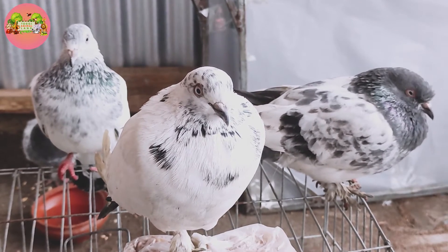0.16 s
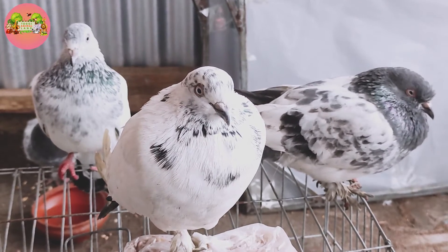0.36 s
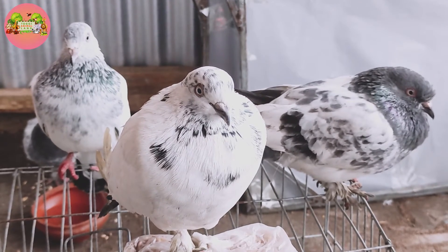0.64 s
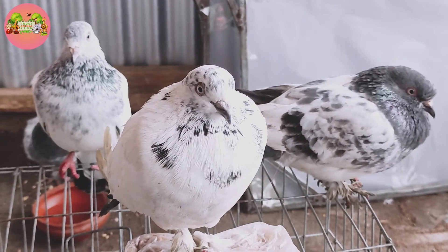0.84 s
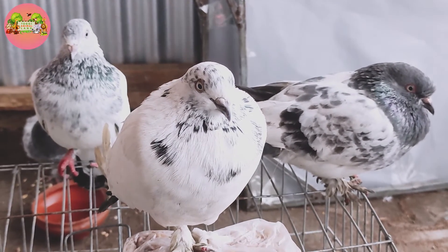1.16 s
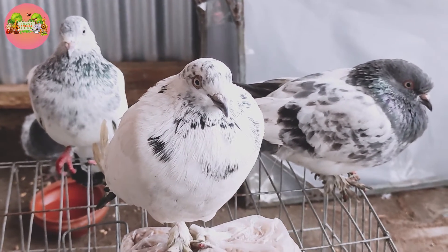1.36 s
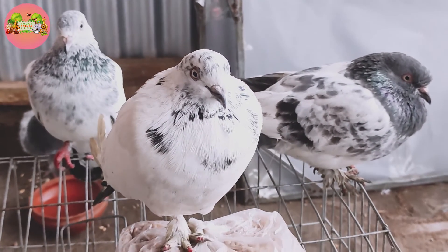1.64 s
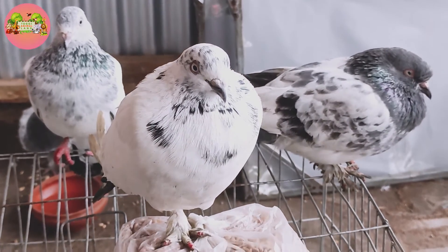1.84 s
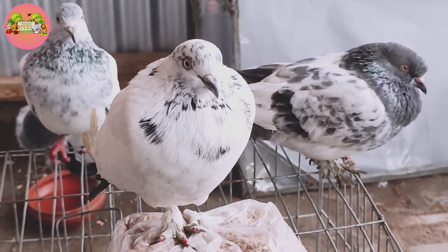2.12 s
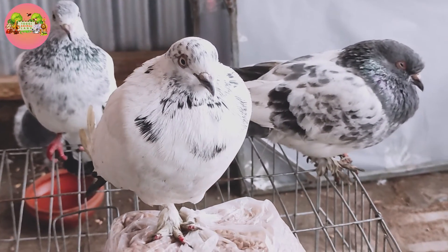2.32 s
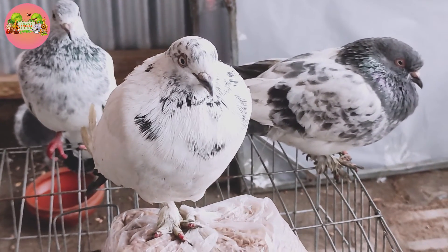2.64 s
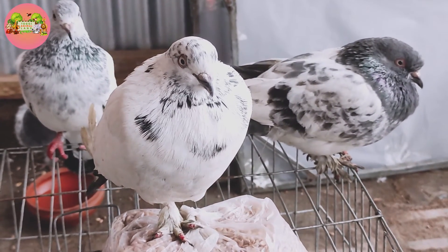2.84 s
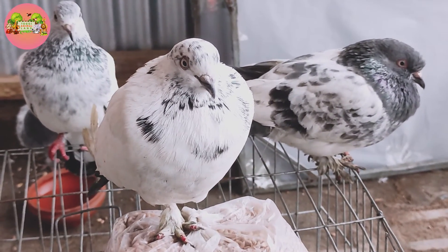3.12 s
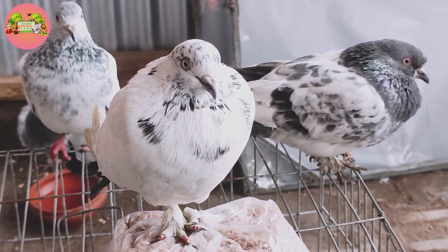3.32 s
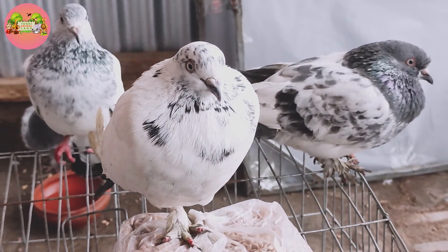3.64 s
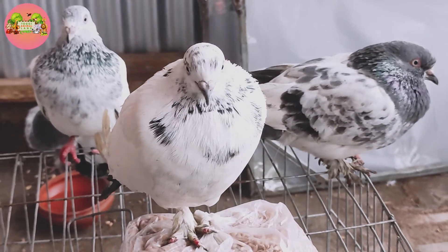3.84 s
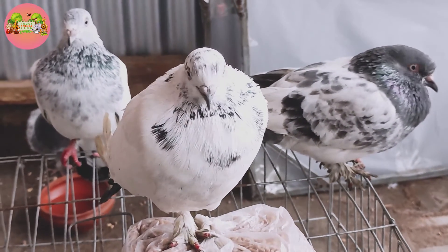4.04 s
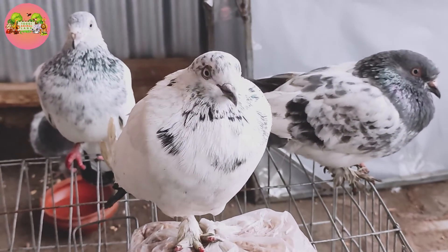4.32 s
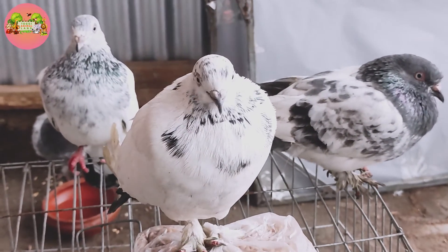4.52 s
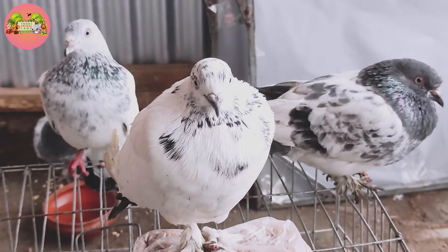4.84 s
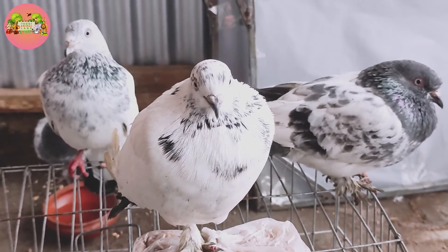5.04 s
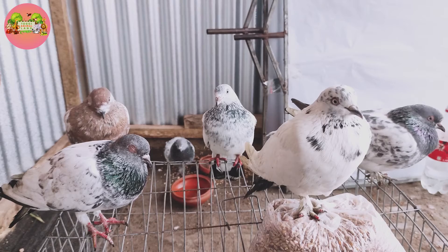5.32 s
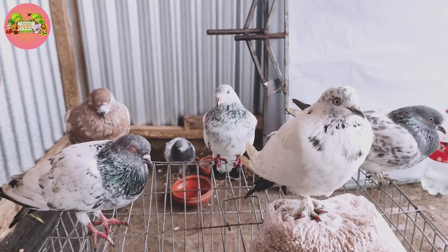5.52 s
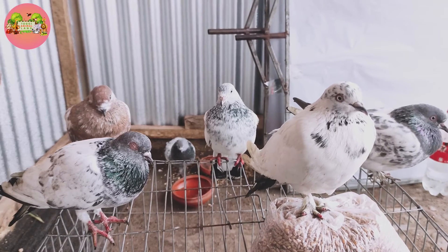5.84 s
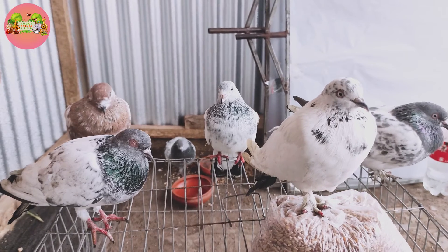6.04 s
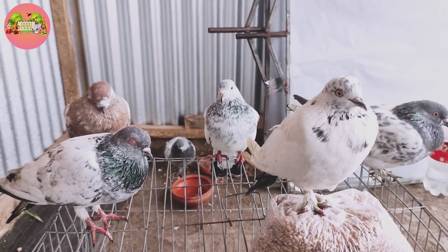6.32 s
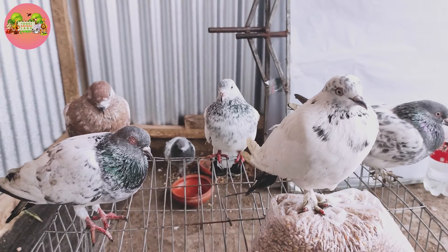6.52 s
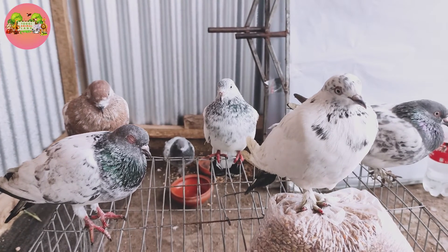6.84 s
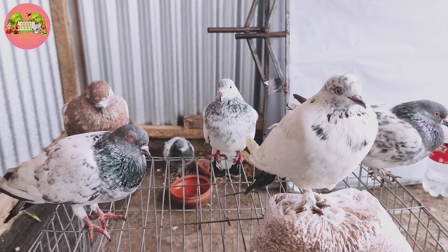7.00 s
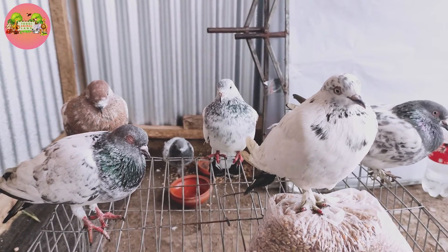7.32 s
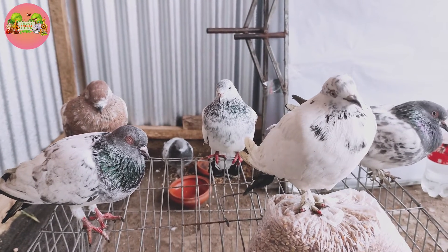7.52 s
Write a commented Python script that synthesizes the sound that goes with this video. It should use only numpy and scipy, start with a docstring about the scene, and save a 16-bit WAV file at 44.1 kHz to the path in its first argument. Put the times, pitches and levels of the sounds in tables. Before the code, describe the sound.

A nearby pigeon hums muffled, round coos about every one and a half seconds, each swelling upward and then gargling as it fades. A hoarse bird at middle distance answers with wheezy squeals opening into rasps, and small paired croaks. Tiny gliding chirps come from outside, densest in the first half. Stereo microphones inside a lightly reverberant metal shed also catch soft outdoor air, low motor hum and occasional bumps.

```python
"""A loft of sheet metal and tarpaulin, where a pigeon coos close by and to the left.
Each coo is a few hummed harmonics that swell in an arch of pitch and break into a throaty flutter.
Another bird squawks hoarsely, in squeals (a thin wheeze of resonant noise that opens into a rasp) and
short double croaks. Small birds chirp outside as warbled glides, heard mostly as echo, over an airy
wash of filtered noise, a far motor's low hum and a few soft knocks."""
import sys
import numpy as np
from scipy import signal
from scipy.fft import rfft, irfft, next_fast_len
from scipy.io import wavfile
from scipy.ndimage import uniform_filter1d, map_coordinates

SR = 44100
rng = np.random.default_rng(int(sys.argv[2]) if len(sys.argv) > 2 else 0)


def generate_wav(signal):
    """Clip the signal to [-1, 1] and save it as 16-bit WAV at the path in sys.argv[1]."""
    frames = np.transpose(np.atleast_2d(signal))
    scaled = np.clip(frames, -1, 1) * 32767
    pcm = np.round(scaled).astype(np.int16)
    wavfile.write(sys.argv[1], SR, pcm)


N = 338247

# Colour of the outdoor wash. Each row: frequency in Hz, relative density in dB per Hz.
AIR_COLOUR = [(20, -35.5), (40, -26), (56, -17), (75, -5), (98, -10), (129, -9), (164, -7.5), (205, -2.5),
              (310, -12), (520, -18), (1310, -20.5), (2420, -28.5), (6500, -34), (11000, -49),
              (15500, -59.5)]
# How alike the wash is left and right. Each row: frequency in Hz, likeness 0-1.
AIR_LIKENESS = [(60, 0.64), (160, 0.53), (430, 0.17), (1140, 0.51), (3050, 0.21), (8160, 1)]
# Stereo lean of wash, hum and knocks. Each row: frequency in Hz, left minus right in dB.
BACKGROUND_BALANCE = [(60, 9), (160, 3), (430, 2.5), (1140, -1), (3050, 1), (8160, 0.0)]
# A far motor's hum. Each row: frequency in Hz, width in Hz, early level in dB, late level in dB.
HUM_LINES = [(66.4, 10, -52.5, -54), (130, 3.5, -52.5, -46), (222.7, 14, -52.5, -49.5)]
# Rising squeals. Each row: time the wheeze opens into a rasp in seconds, wheeze length in seconds,
# rasp length in seconds, level in dB, swell over the wheeze in dB, brightness in dB, first, second and
# last pitch in Hz, second resonance in dB, rasp share 0-1, rasp centre in Hz, shrill overtone in Hz,
# its level in dB, its entry after the opening in seconds.
SQUEALS = [(0.386, 0.042, 0.077, -33.5, 15, -12, 1526, 1570, 1590, 17, 0.14, 2000, 5420, -13, -.01),
           (.478, 0.068, 0.042, -27, 20, -2.5, 1720, 1790, 1830, 5, 0.23, 2200, 5030, -10, -0.000097),
           (2.379, 0.09, .044, -28, 13, -4.5, 1442, 1560, 1657, 0, .32, 2400, 4490, -15, -0.041),
           (3.524, .095, .044, -20, 22.5, -5.5, 1973, 2180, 2310, -16, 0.75, 1420, 4074, -5, -.025),
           (4.641, .11, .122, -19, 30.5, -7.5, 1638, 1760, 2042, -8, .8, 2300, 4100, -9, .028),
           (5.646, .08, .04, -35, 12.5, -5, 1930, 2145, 2600, -17, 0.8, 1500, 4330, -12, -.022),
           (5.897, .105, .044, -28, 17, -5.5, 1830, 2170, 2520, -15, 0.45, 2450, 4350, -10, -.033),
           (6.369, 0.092, .029, -33, 9.5, -6.5, 1670, 1740, 1835, -9, 1, 1700, 5560, -13.5, -0.054),
           (7.061, 0.081, .082, -26, 11.5, -7, 1530, 1620, 1680, -4.5, 0.2, 1450, 4900, -16, -.02)]
# Upper resonances of the wheeze. Each row: ratio to the gliding pitch, width in Hz, level in dB.
WHEEZE_RESONANCES = [(2.0, 260, -19), (2.749, 299, -19.5), (3.5, 280, -18.5)]
# Colour of the rasp. Each row: frequency in Hz, relative density in dB per Hz.
RASP_COLOUR = [(470, -49.5), (800, -29), (910, -22.5), (996, -11), (1350, -3.5), (1640, -0.5), (1980, -3),
               (2390, -1.5), (2750, -4.5), (3200, -9.5), (4210, -11), (4650, -10), (5400, -11), (6080, -18),
               (7200, -20.5), (8610, -33), (11200, -56), (18900, -120)]
# Double croaks. Each row: first puff in seconds, level in dB, second puff above the first in dB,
# brightness in dB.
CROAKS = [(.535, -29.5, 1, -7), (2.018, -35.5, 3.5, -13), (2.614, -35.5, 1.5, -9), (3.184, -31, 5.5, -8),
          (3.839, -34.5, 2, -13), (4.68, -30, -2, -2.5), (5.159, -35.5, 2, -13), (5.939, -35.5, 1.5, -7),
          (6.089, -36, 4, -10.5), (6.58, -36.5, 0.5, -9.5), (6.93, -35.5, 1.5, -7.5),
          (7.15, -33.5, -1.5, -1.5), (7.32, -38, 2.5, -6.5)]
# The croak's voice. One row: the columns of a squeal from first pitch in Hz to shrill entry in seconds.
CROAK_VOICE = (1528, 1560, 1610.5, 1, 1.2, 1750, 4980, -17, -.03)
# How fast the loft's echo dies. Each row: frequency in Hz, time to fall 60 dB in seconds.
LOFT_DECAY = [(200, 1), (1000, 0.35), (3000, 0.58), (8000, 0.55)]
# Coos. Each row: start in seconds, length in seconds, top of the pitch arch in Hz, climb time in seconds,
# level in dB, tiring in dB per second, closing fall in seconds, share of the crop's deep boom in dB.
COOS = [(.56, 0.4, 149.5, .15, -17.5, 0, 0.025, 0), (1.489, 1.04, 230.2, 0.24, -14.5, 8.5, .16, -5.5),
        (3.09, 0.88, 231.5, 0.25, -16, 13.5, 0.04, -4.5), (4.55, 1.01, 232.4, 0.22, -15.5, 11, 0.084, -4.5),
        (6.275, 0.643, 230.2, .195, -14, 10, 0.029, -3), (7.36, 0.76, 236, 0.22, -14.5, 10, 0.063, -6.5)]
# Where the throat breaks into a flutter. Each row: middle in seconds, length in seconds,
# added roughness 0-1, loudness lost in dB.
FLUTTERS = [(0.72, 0.13, 0.06, 6.5), (2.014, 0.072, 0.16, 1), (2.184, 0.07, 0.19, 2),
            (2.314, 0.058, 0.55, 3), (2.38, 0.09, 0.41, 3), (3.504, 0.04, 0.21, 0.5),
            (3.671, 0.062, 0.41, 4), (3.765, 0.1, 0.46, 3.5), (5.121, 0.11, 0.33, 5), (5.27, 0.078, .4, 2),
            (5.398, 0.2, 0.42, 2.5), (6.723, 0.042, 0.27, 1), (6.798, 0.094, 0.18, 6.5)]
# What closed beak and swollen throat let through. Each row: frequency in Hz, gain in dB.
THROAT = [(100, -46.5), (170, -16), (215, 11), (290, 2.5), (335, -6.5), (380, -2), (450, 4.5), (530, -0.5),
          (585, -17), (700, -22.5), (900, -42.5), (1400, -85)]
# Low loft resonances that the coo sets ringing. Each row: frequency in Hz, width in Hz, level in dB.
LOFT_RINGS = [(293.5, 7.1, 6), (368.4, 9.2, 3.5), (517, 22, -8.5)]
# The pigeon's level at the two microphones. Each row: frequency in Hz, left minus right in dB.
COO_BALANCE = [(225, 4.7), (290, 2.5), (450, 4.2), (530, 7)]
# The pigeon's phase at the two microphones. Each row: frequency in Hz, lead of the left in radians.
COO_PHASE = [(225, -.58), (290, -1.0), (380, -.3), (450, 0), (530, .7)]
# Soft knocks in the loft. Each row: start in seconds, frequency in Hz, width in Hz, level in dB,
# time to fall 60 dB in seconds.
KNOCKS = [(0.83, 698, 610, -34.5, 0.37), (1.122, 910, 454, -26.5, 0.11), (5.53, 111.4, 40.16, -38.5, 1)]
# Small birds outside. Each row: start in seconds, length in seconds, first pitch in Hz, last pitch in Hz,
# level in dB before distance.
CHIRPS = [(1.326, 0.067, 3600, 4810, -43.5), (1.524, 0.035, 3600, 2920, -47),
          (1.531, 0.024, 7070, 6370, -52), (1.618, 0.052, 5660, 4580, -41), (1.768, 0.061, 5260, 3390, -40),
          (1.888, 0.03, 3800, 3560, -53), (1.948, 0.025, 3530, 3190, -46.5),
          (2.525, 0.052, 5000, 3720, -42.5), (2.723, 0.027, 5250, 4730, -39.5),
          (2.735, 0.035, 4100, 3310, -41.5), (2.863, 0.081, 4640, 3860, -39.5),
          (3.008, 0.077, 4790, 4560, -42), (3.092, 0.042, 4210, 3570, -45),
          (3.375, 0.054, 5600, 3900, -40.5), (3.711, 0.042, 4370, 3330, -43),
          (4.068, 0.035, 4820, 3540, -51), (6.64, 0.039, 4820, 4410, -45),
          (6.809, 0.073, 3490, 5000, -43.5)]

AIR_DB, AIR_SWELL_DB = -41.5, 1.46
HUM_SHIFTS_S = 5.2

# The squeal's pitch steps up twice: times from the opening.
PITCH_STEPS_S = (-.034, .005)
SQUEAL_ATTACK_S, SQUEAL_SAG_DB_PER_S, SQUEAL_RELEASE_DB_PER_S = 0.025, 49, 449
PUFF_GAP_S, PUFF_RISE_S, PUFF_FALL_S = 0.068, 0.029, 0.022

# Every coo climbs from one low pitch and sags by this share as it closes.
COO_START_HZ, CLIMB_CURVE, END_SAG = 109.67, 1.35, .2
# Loudness follows pitch, and drops further once the bird tires.
FULL_HZ, SOFTER_DB_PER_OCTAVE, TIRES_AFTER_S = 239.7, 14, 0.52
COO_ATTACK_S, COO_RELEASE_S = 0.071, 0.065
# Roughness 0-1 at the starting pitch and at full pitch, before any flutter.
ROUGH_LOW, ROUGH_FULL = 0.43, 0.21
FLUTTER_LIFT = 0.0488  # share of pitch added per unit of flutter roughness
# The crop booms once the pitch is high enough, and the whole voice gains with it.
BOOM_FROM_HZ, BOOM_SPREAD_HZ, BOOM_LOW_DB, BOOM_GAIN_DB = 210, 9.4, -8.5, 8

COO_ROOM_DB, CHIRP_DIRECT_DB = -13, -15
EDGE_HZ = 15500


def gain_of(db):
    """Decibels to gain."""
    return 10 ** (np.asarray(db) / 20)


def evened(x):
    """Scales to rms 1."""
    return x / np.sqrt(np.mean(x ** 2) + 1e-20)


def read(points, hz):
    """Reads a table on a log-frequency axis."""
    f, value = np.transpose(points)
    return np.interp(np.log(hz + 1), np.log(f + 1), value)


def add(mix, s, sound):
    """Mixes a sound in at time s."""
    part = mix[max(round(s * SR), 0):][:len(sound)]
    part += sound[:len(part)]


def shaped(x, gain):
    """Filters by a gain that is a function of frequency."""
    size = next_fast_len(x.shape[-1] + 4096)
    spectrum = rfft(x, size) * gain(np.fft.rfftfreq(size, 1 / SR))
    return irfft(spectrum, size)[..., :x.shape[-1]]


def wander(size, hz):
    """Smooth random drift of rms about 1, up to about hz changes a second."""
    knots = rng.standard_normal(int(size / SR * hz * 2) + 4)
    return map_coordinates(knots, [np.arange(size) / SR * hz * 2], order=3, mode="mirror")


def steadied(x, seconds):
    """Holds the running power near 1."""
    size = max(int(seconds * SR), 2)
    power = uniform_filter1d(uniform_filter1d(x ** 2, size), size)
    return x / np.sqrt(abs(power) + 1e-12)


def split(x, hz):
    """The parts below and above hz."""
    low = shaped(x, lambda f: 1 / (1 + (f / hz) ** 24))
    return low, x - low


def whistle(size, hz, width):
    """Noise in a steep resonance that follows hz: slow noise around zero, shifted up to pitch."""
    r = np.exp(-np.pi * abs(width) / SR)
    noise = rng.standard_normal((size + 4096, 2)) @ [1, 1j]
    slow = signal.lfilter([1], [1, -2 * r, r * r], noise)[-size:]
    carrier = np.exp(2j * np.pi * np.cumsum(hz * np.ones(size)) / SR)
    return evened((slow * carrier).real)


def placed(x, balance, phase):
    """Gives each microphone its own level and phase."""
    side = np.array([[.5], [-.5]])
    return shaped(x, lambda f: gain_of(side * read(balance, f)) * np.exp(1j * side * read(phase, f)))


def air():
    """Gently swelling outdoor wash: noise widest in the low mids, alike in both ears at the top."""
    left, other = rng.standard_normal((2, N))
    same = lambda f: np.clip(read(AIR_LIKENESS, f), 0, 1)
    right = shaped(left, same) + shaped(other, lambda f: np.sqrt(1 - same(f) ** 2))
    wash = evened(shaped(np.array([left, right]), lambda f: gain_of(read(AIR_COLOUR, f))))
    return wash * gain_of(AIR_DB + AIR_SWELL_DB * wander(N, 3))


def hum():
    """A far motor: wavering narrow noise lines, the upper two growing late on."""
    late = np.clip((np.arange(N) / SR - HUM_SHIFTS_S) / 0.14, 0, 1)
    total = np.zeros(N)
    for hz, width, early_db, late_db in HUM_LINES:
        line = steadied(whistle(N, hz, width), 0.26)
        total += gain_of(early_db + (late_db - early_db) * late) * line
    return total


def sputter(x, patch_db, count=4):
    """Breaks a hiss into uneven clusters, some hundred hertz wide and some milliseconds long."""
    z = signal.stft(x, nperseg=256)[2]
    chance = rng.standard_normal(z.shape)
    patches = evened(uniform_filter1d(uniform_filter1d(chance, count, 0), count, 1))
    return signal.istft(z * gain_of(patch_db * patches), nperseg=256)[1][:len(x)]


def squawk(t, bright_db, first_hz, second_hz, last_hz, second_db, share, rasp_hz,
           shrill_hz, shrill_db, shrill_s):
    """Air sings in stepping, fraying resonances; a shrill overtone slides in, a rasp opens at t = 0."""
    size = len(t)
    after = lambda s, ramp_s: (1 + np.tanh((t - s) / ramp_s)) / 2
    pushed, forced = (after(s, .0077) for s in PITCH_STEPS_S)
    stepped_hz = first_hz + (second_hz - first_hz) * pushed + (last_hz - second_hz) * forced
    hz = stepped_hz * (1 + .01196 * pushed * wander(size, 40.23))
    following = lambda part: first_hz + part * (hz - first_hz)  # the higher resonances glide less

    def frayed(centre, width):
        """A steady whistle with a wide, ragged one (650 Hz) joining as the pitch steps up."""
        ragged = gain_of(-7) * pushed * whistle(size, centre, 650)
        return steadied(whistle(size, centre, width), 0.0056) + ragged

    wheeze = frayed(hz, 55) + gain_of(second_db) * frayed(1.7 * following(.55), 160)
    for ratio, width, db in WHEEZE_RESONANCES:
        wheeze += gain_of(db) * whistle(size, ratio * following(.3), width)

    grainy = rng.standard_normal(size) * np.exp(.24 * wander(size, 130))
    hiss = sputter(grainy, patch_db=3.5)
    # a 5 dB bump lifts the rasp around its own centre
    rasp = shaped(hiss, lambda f: gain_of(read(RASP_COLOUR, f) + 5 / (1 + ((f - rasp_hz) / 350) ** 2)))
    # a little rasp leaks in before the opening
    harsh = np.clip(0.028 + .11 * pushed + share * after(0, .005), 0, .92)

    entry = after(shrill_s, .015)
    slide_hz = shrill_hz * (1 - .1 * (1 - entry))
    overtones = whistle(size, slide_hz, 260) + gain_of(-15) * whistle(size, 2 * slide_hz, 520)
    shrill = gain_of(shrill_db) * entry * split(overtones, 8460)[0]

    voice = np.sqrt(1 - harsh) * evened(wheeze) + np.sqrt(harsh) * evened(rasp) + shrill
    body, edge = split(voice, 3010)
    return steadied(body, 0.032) + gain_of(bright_db) * steadied(edge, 0.022)


def squeal(opens, wheeze_s, rasp_s, level_db, swell_db, *voice):
    """A wheeze swells until it opens; the rasp sags slowly, then drops away fast."""
    t = np.arange(-wheeze_s, rasp_s + .1, 1 / SR)
    db = level_db + swell_db * np.minimum(t / wheeze_s, 0)
    db -= SQUEAL_SAG_DB_PER_S * np.maximum(t, 0)
    db -= SQUEAL_RELEASE_DB_PER_S * np.maximum(t - rasp_s, 0)
    attack = np.minimum((t + wheeze_s) / SQUEAL_ATTACK_S, 1)
    return opens - wheeze_s, attack * gain_of(db) * squawk(t, *voice)


def loft(x, early_s=0.0099):
    """Reflections off metal walls: sparse taps, loudest at first, each band dying at its own speed."""
    size = SR // 2
    t = np.arange(size) / SR
    taps = rng.standard_normal((2, size)) * (rng.random((2, size)) < 3000 / SR)
    taps *= (t > .002) * (1 + 2 * np.exp(-t / early_s))
    hz, t, z = signal.stft(taps, SR, nperseg=256)
    decay = gain_of(-60 * t / read(LOFT_DECAY, hz)[:, None])
    tail = signal.istft(z * decay, SR, nperseg=256)[1]
    tail = tail / np.linalg.norm(tail, axis=1, keepdims=True)
    return signal.fftconvolve(x[None], tail, axes=1)[:, :N]


def croak(s, level_db, second_db, bright_db, lead_s=.06):
    """Two quick puffs of the same hoarse voice at a low, nearly level pitch."""
    t = np.arange(-lead_s, PUFF_GAP_S + 0.15, 1 / SR)
    puff = lambda u: np.where(u < 0, np.exp(-(u / PUFF_RISE_S) ** 2 / 2), 1 / np.cosh(u / PUFF_FALL_S))
    swell = np.hypot(puff(t), gain_of(second_db) * puff(t - PUFF_GAP_S))
    return s - lead_s, gain_of(level_db) * swell * squawk(t, bright_db, *CROAK_VOICE)


def ringing(f):
    """The throat's pass band times the ringing of the loft."""
    rings = sum(gain_of(db) / (1 + 2j * (f - hz) / width) for hz, width, db in LOFT_RINGS)
    return gain_of(read(THROAT, f)) * (1 + rings)


def coo(start, length, top_hz, climb_s, level_db, tiring_db, fall_s, boom_db):
    """The syrinx hums an arch; pushed, pitch flutters at a third of its rate, loudness at two thirds."""
    t = np.arange(0, length, 1 / SR)
    size = len(t)
    climb = top_hz + (COO_START_HZ - top_hz) * np.exp(-(t / climb_s) ** CLIMB_CURVE)
    arch = climb * (1 - END_SAG * np.exp((t - length) / fall_s))

    middle, span, depth, loss_db = np.transpose(FLUTTERS)
    within = np.exp(-(2 * (start + t[:, None] - middle) / span) ** 4)
    broken = within @ depth
    swollen = (1 + np.tanh((arch - BOOM_FROM_HZ) / BOOM_SPREAD_HZ)) / 2
    pitch = arch * (1 + FLUTTER_LIFT * broken)
    rough = np.interp(arch, [COO_START_HZ, FULL_HZ], [ROUGH_LOW, ROUGH_FULL])
    rough = np.clip(rough + broken, 0, 1)

    effort_db = level_db + SOFTER_DB_PER_OCTAVE * np.log2(arch / FULL_HZ)
    effort_db -= tiring_db * np.maximum(t - TIRES_AFTER_S, 0)
    effort_db += 1.27 * wander(size, 9.52) - within @ loss_db - BOOM_GAIN_DB * (1 - swollen)

    flutter = 2 * np.pi * np.cumsum(pitch * (1 + .051 * wander(size, 25))) / SR / 3
    jitter = .019 * (0.31 + 2 * rough) * wander(size, 50.04)
    phase = 2 * np.pi * np.cumsum(pitch * (1 + jitter)) / SR
    phase += 1.27 * rough * np.sin(flutter) / 2
    tone = 0.86 * np.cos(phase) + np.sin(2 * phase)
    tone += gain_of(-8) * (np.cos(3 * phase) + np.cos(4 * phase) / 2)

    # at its roughest the flutter falls apart into a gargle
    throb = 1 + .87 * rough * np.sin(2 * flutter)
    drive = tone * (1 - 0.97 * rough ** 2) * throb + rough * whistle(size, 370, 380)
    deep, upper = split(shaped(drive, ringing), 272.0)
    boom = np.clip(gain_of(BOOM_LOW_DB + (boom_db - BOOM_LOW_DB) * swollen), 0, .95)
    voice = boom * steadied(deep, 0.054) + np.sqrt(1 - boom ** 2) * steadied(upper, 0.058)
    fade = np.minimum(t / COO_ATTACK_S, 1) * np.minimum((length - t) / COO_RELEASE_S, 1) ** 2
    return start, gain_of(effort_db) * voice * fade


def knock(s, hz, width, db, t60):
    """A dull bump: resonant noise that swells and dies away, cut at half a second."""
    t = np.arange(SR // 2) / SR
    return s, gain_of(db - 60 * t / t60) * (1 - np.exp(-t / 0.037)) * whistle(len(t), hz, width)


def chirp(s, length, first_hz, last_hz, db):
    """A short gliding note with a fast, uneven warble and a hoarse buzz just under it."""
    size = int(length * SR)
    hz = np.linspace(first_hz, last_hz, size)
    strain = np.clip(abs(last_hz - first_hz) / 700, .3, 1)  # level notes are the purest
    warbled_hz = hz * (1 + strain * .0662 * wander(size, 160))
    note = np.sin(2 * np.pi * np.cumsum(warbled_hz) / SR)
    buzz = strain * gain_of(-1) * whistle(size, .94 * hz, 1300)
    return s, gain_of(db) * evened((note + buzz) * signal.windows.tukey(size, .5))


def scene():
    """The pigeon is near and left, the squawks farther off, the chirps mostly echo."""
    pigeon, hoarse, small, bumps = np.zeros((4, N))
    for row in SQUEALS:
        add(hoarse, *squeal(*row))
    for row in CROAKS:
        add(hoarse, *croak(*row))
    for row in COOS:
        add(pigeon, *coo(*row))
    for row in KNOCKS:
        add(bumps, *knock(*row))
    for row in CHIRPS:
        add(small, *chirp(*row))
    near = placed(pigeon, COO_BALANCE, COO_PHASE) + gain_of(COO_ROOM_DB) * loft(pigeon)
    middle = hoarse + loft(hoarse)
    far = gain_of(CHIRP_DIRECT_DB) * small + gain_of(2.0) * loft(small, early_s=0.11)
    background = placed(air() + hum() + bumps, BACKGROUND_BALANCE, [(100, 0.005)])
    return gain_of(-0.42) * near + gain_of(-3.0) * middle + far + background


def record(dry):
    """The microphone sheds the deepest bass; then the band limit."""
    thinned = shaped(dry, lambda f: 1 - 0.64 / (1 + (f / 56) ** 14))
    band_limit = signal.firwin(511, EDGE_HZ, window=("kaiser", 9), fs=SR)
    return signal.oaconvolve(thinned, band_limit[None], "same")


dry = scene()
out = record(dry)
generate_wav(out)
```